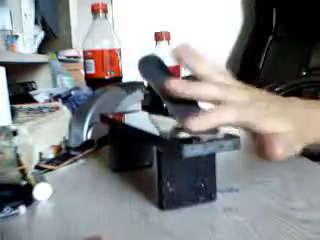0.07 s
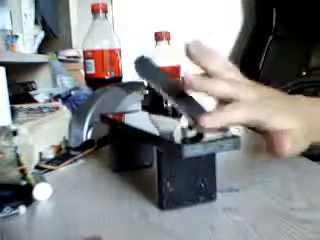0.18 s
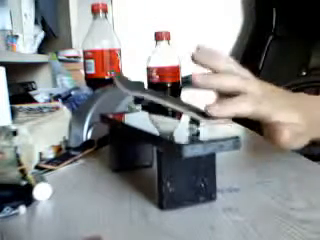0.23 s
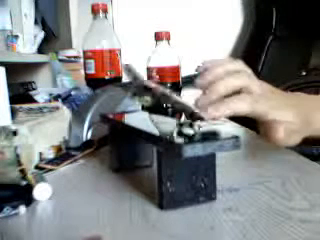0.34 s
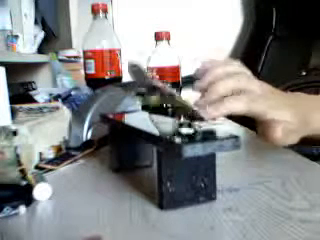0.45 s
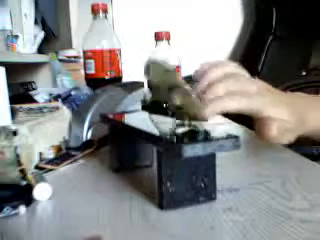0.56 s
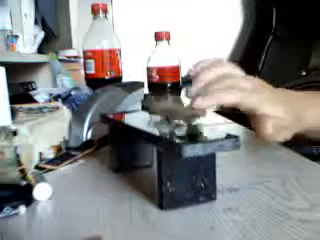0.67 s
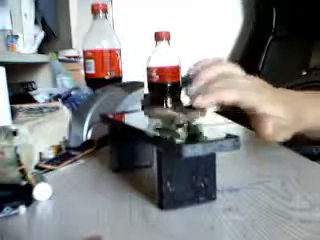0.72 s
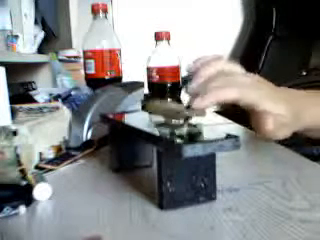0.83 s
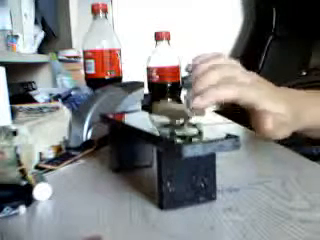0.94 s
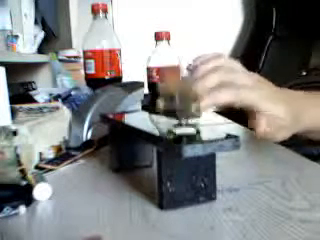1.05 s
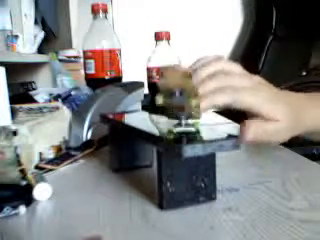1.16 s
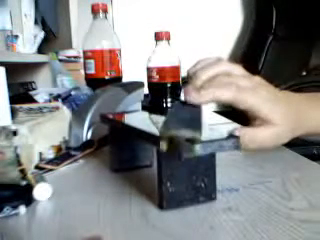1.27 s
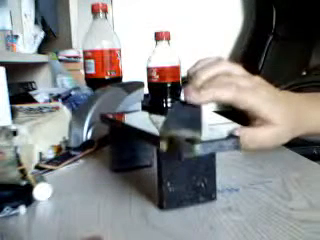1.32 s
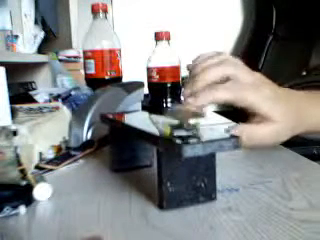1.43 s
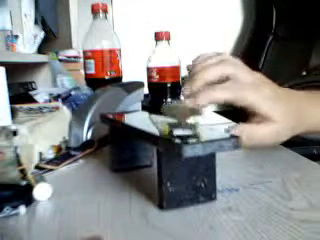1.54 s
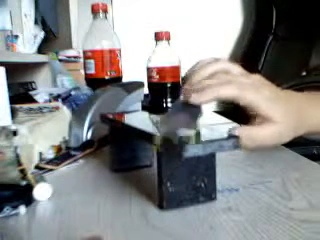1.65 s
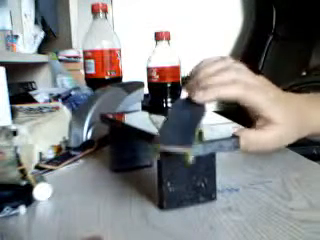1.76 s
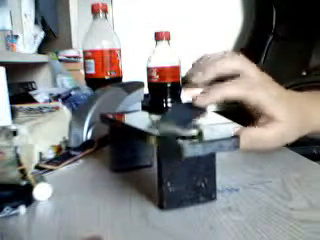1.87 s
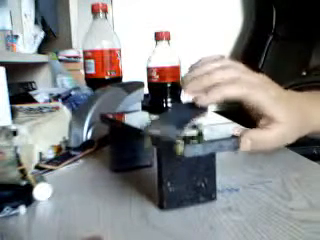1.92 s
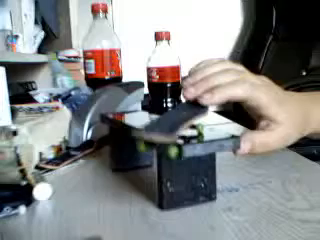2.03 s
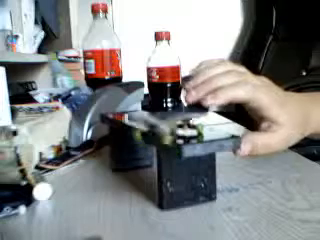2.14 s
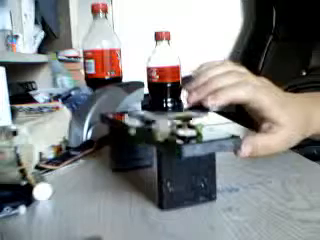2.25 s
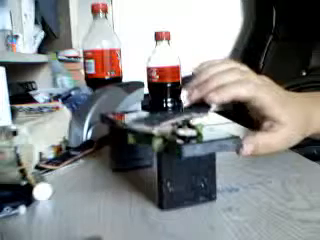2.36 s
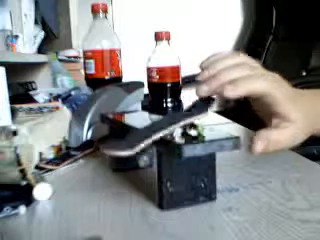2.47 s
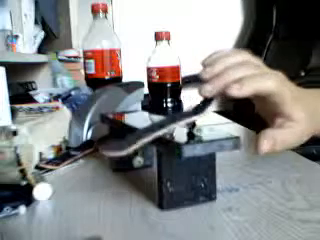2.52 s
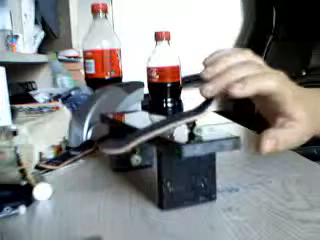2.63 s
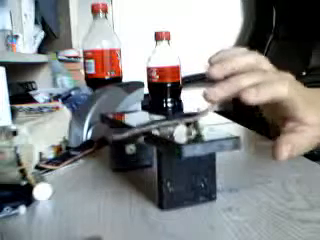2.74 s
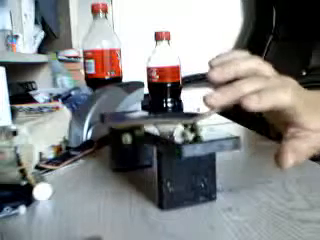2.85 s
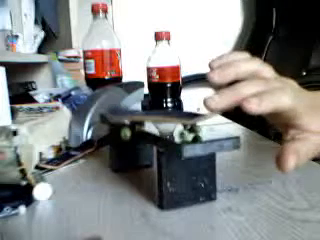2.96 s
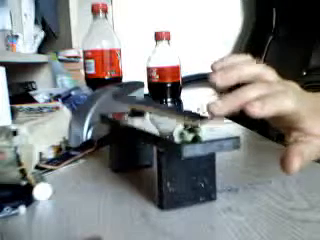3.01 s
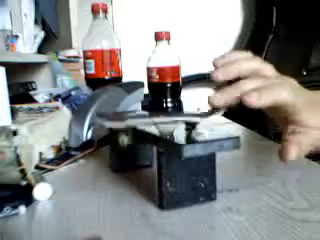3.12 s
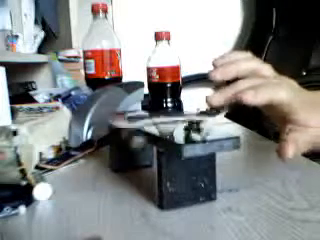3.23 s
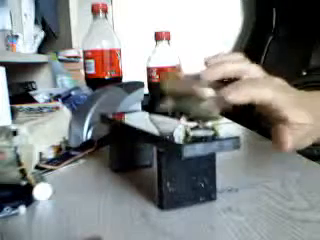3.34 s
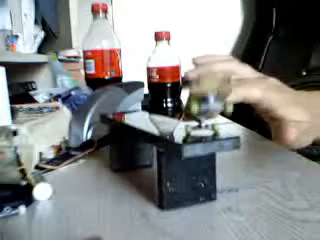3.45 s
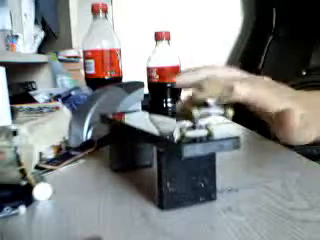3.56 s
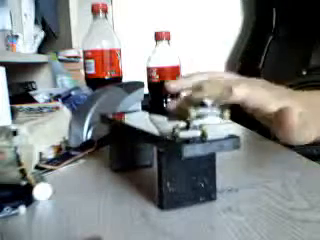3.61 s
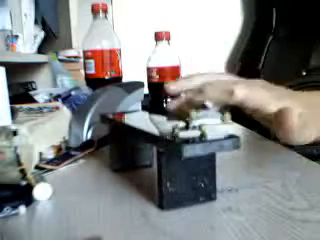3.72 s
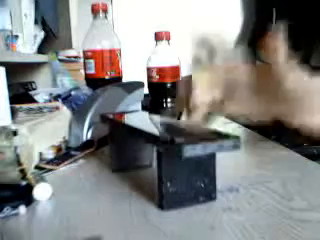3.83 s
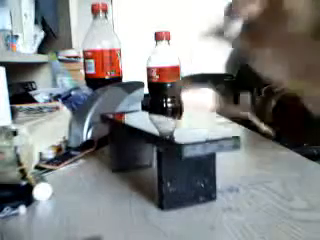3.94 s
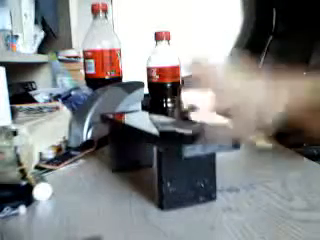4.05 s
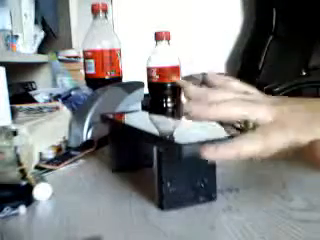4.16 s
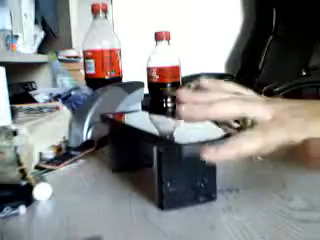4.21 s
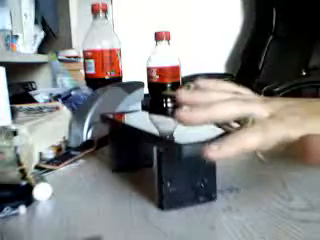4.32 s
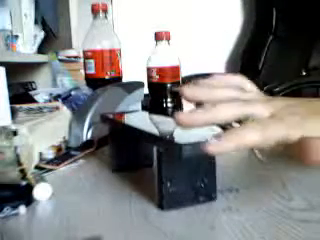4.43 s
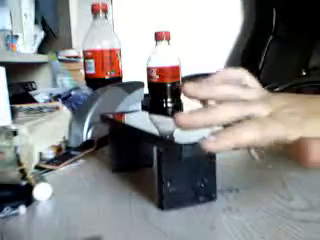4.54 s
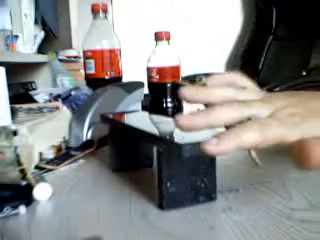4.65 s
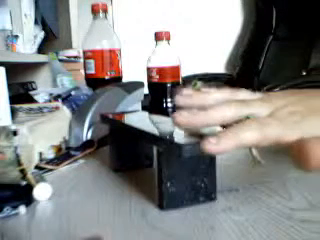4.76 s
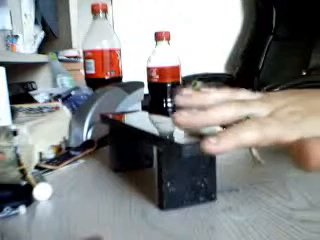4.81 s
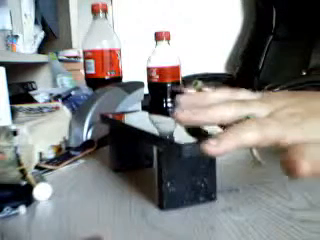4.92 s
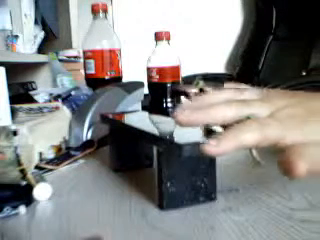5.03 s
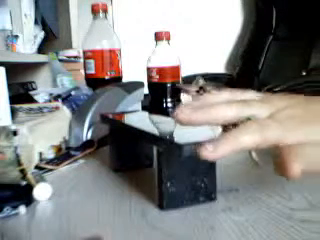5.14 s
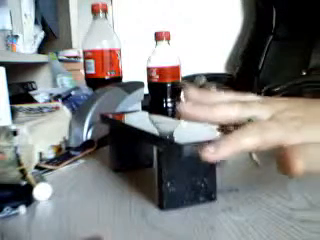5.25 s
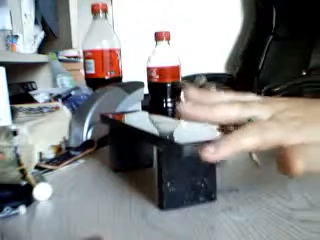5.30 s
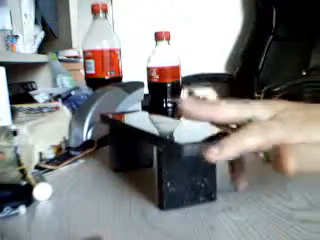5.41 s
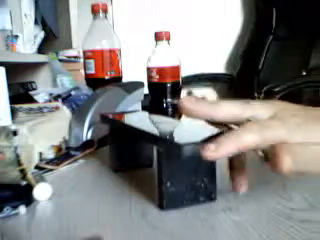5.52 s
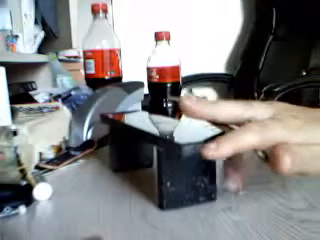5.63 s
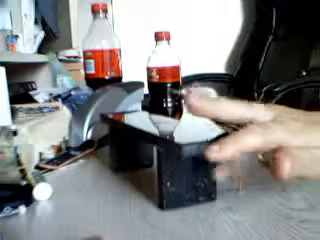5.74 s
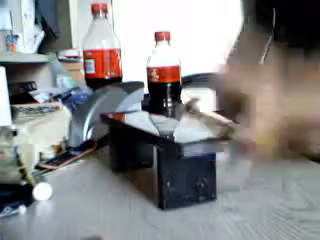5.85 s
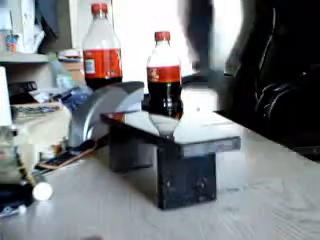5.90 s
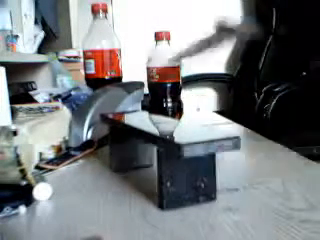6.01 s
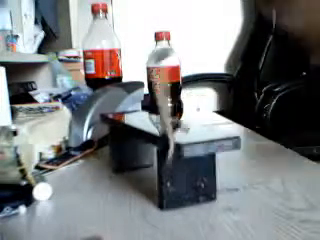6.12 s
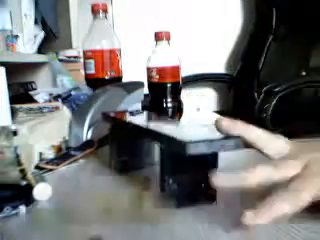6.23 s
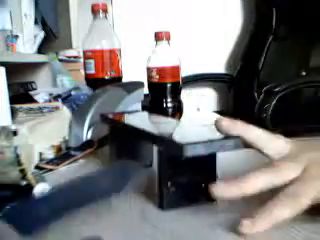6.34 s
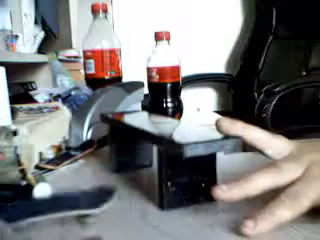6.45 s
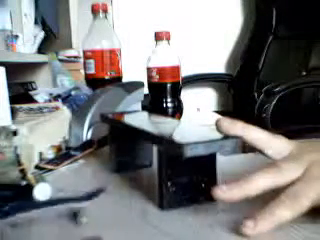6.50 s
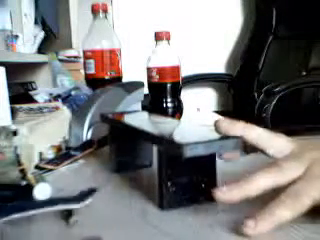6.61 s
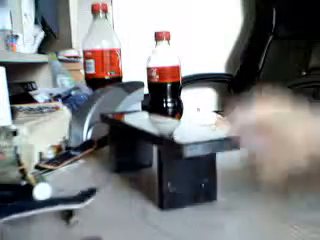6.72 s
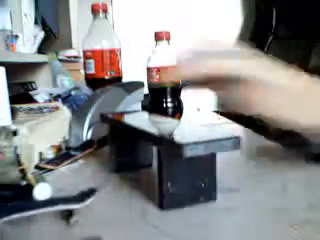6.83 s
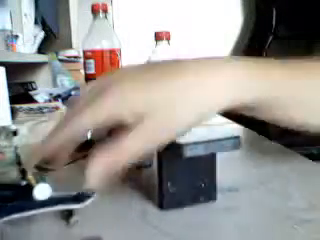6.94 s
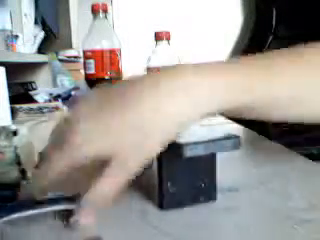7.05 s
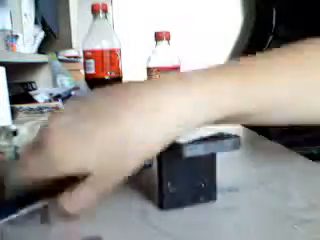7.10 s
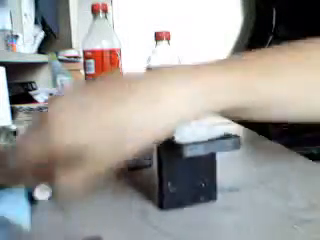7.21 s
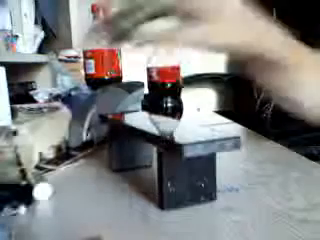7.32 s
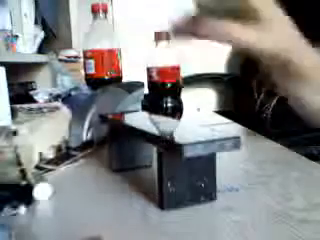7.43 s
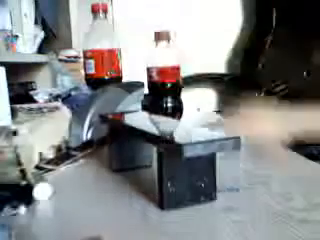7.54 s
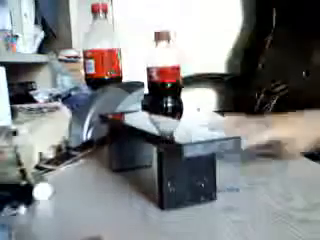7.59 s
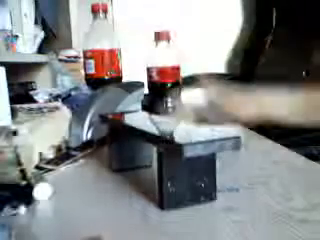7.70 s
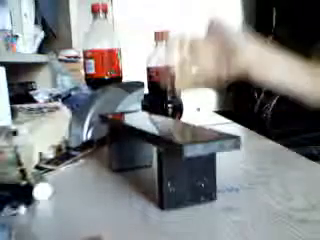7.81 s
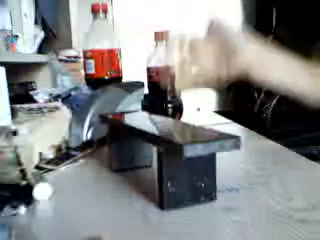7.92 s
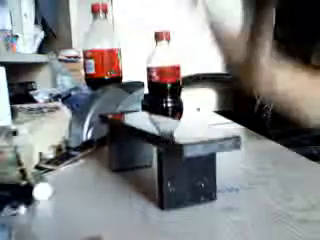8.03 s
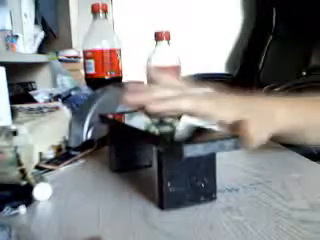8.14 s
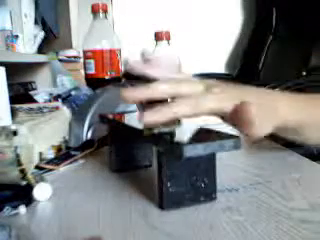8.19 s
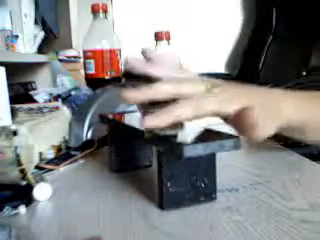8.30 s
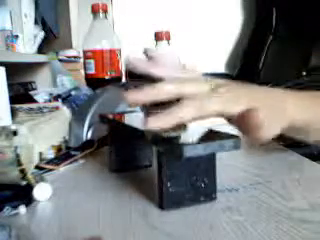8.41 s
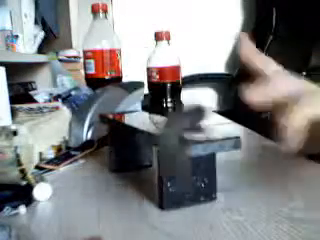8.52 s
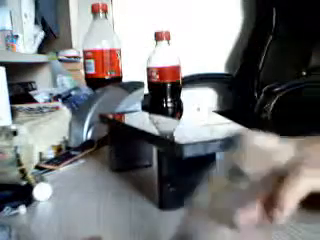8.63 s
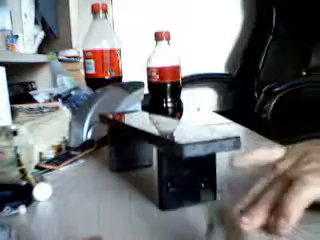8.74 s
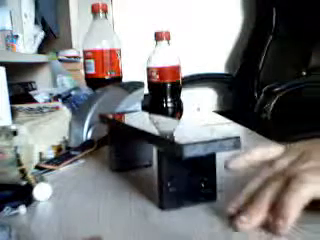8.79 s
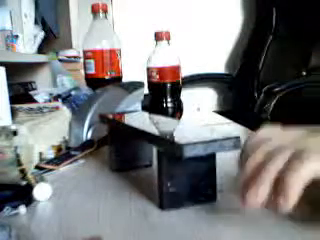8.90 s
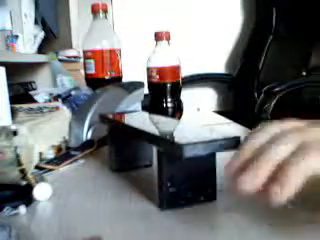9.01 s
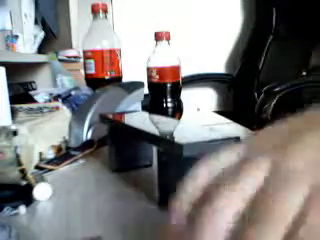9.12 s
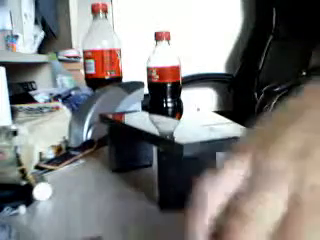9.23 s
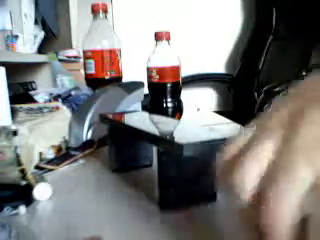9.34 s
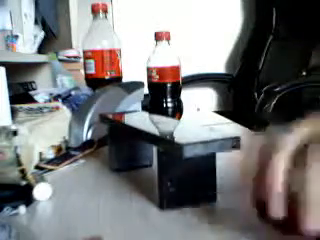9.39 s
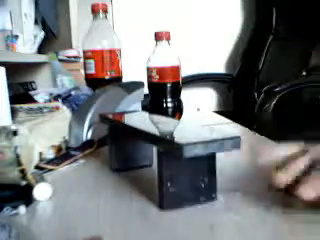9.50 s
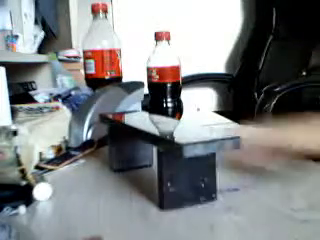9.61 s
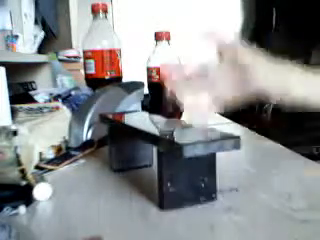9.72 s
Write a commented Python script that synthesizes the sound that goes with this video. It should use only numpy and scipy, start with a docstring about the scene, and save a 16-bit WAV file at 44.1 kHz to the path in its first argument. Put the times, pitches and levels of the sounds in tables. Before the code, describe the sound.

A toy skateboard is handled close to a modest microphone in a small room, over steady soft hiss. A soft fingertip knock comes at 0.1 seconds, then faint bright ticks at 0.9, 1.3 and 1.65. Quiet follows until a tight flurry of small clicks from 3.8 to 4.1, with weak ticks to 4.4. Faint touches at 5.1 to 5.25 bring a very faint wheel spin; a click follows at 5.8. A hard clack at 6.05 with a short whirr leads to a loud double landing at 6.27 and small rattles until 6.5. Light ticks and a faint scrape occur around 7.0 to 7.2. Strong clacks at 7.5, 7.7 and 8.05 surround a short gritty scrape at 7.6. Soft wooden knocks from 8.4 precede lower, woodier clatters at 8.55 to 8.8. Weak taps from 9.1 end in another scrape near 9.6 and a click. Low air rumbles swell, strongest near 7.8 and 9.7.

```python
"""A small room, close to a webcam: a toy skateboard is popped, slid and dropped on a stone ledge and wooden table.
Noisy blows and rattles ring wheels, deck, hollow, axles and ledge as resonances; grit feeds the same parts in scrapes.
Soft pulses ring the table, short sines make ticks, and narrow noise makes a wheel spin on.
The room answers with decaying noise; the microphone adds hiss and low noise from air pushed by the hand."""
import sys
import numpy as np
from scipy import signal
from scipy.fft import rfft, irfft, next_fast_len
from scipy.io import wavfile
from scipy.ndimage import uniform_filter1d

SR = 44100
rng = np.random.default_rng(int(sys.argv[2]) if len(sys.argv) > 2 else 0)


def log_audio(samples):
    """Write samples as a 16-bit WAV file to the path given in sys.argv[1]."""
    # one column per channel
    frames = np.atleast_2d(samples).T
    # limit to full scale, then quantise
    limited = np.clip(frames, -1, 1)
    pcm = np.round(limited * 32767).astype(np.int16)
    wavfile.write(sys.argv[1], SR, pcm)


N = 430416
SPAN = 20000  # samples rendered for each event

# resonances of the board and what it lands on: centre_hz, width_hz, gain_db
WHEELS = [(3700, 1180, -1), (4360, 700, 4.5), (5150, 1640, -3.5)]
# resonances of the deck: centre_hz, width_hz, gain_db
DECK = [(1935, 700, 0), (2720, 1100, -12), (3180, 930, -4)]
# the air and panel under the landing place: centre_hz, width_hz, gain_db
HOLLOW = [(796, 420, -8), (1066, 250, -6.5), (1492, 400, -1.5)]
# resonances of the axles: centre_hz, width_hz, gain_db
AXLES = [(6300, 3800, -0.5), (8000, 1400, 5), (8350, 2100, 4)]
# the stone slab: centre_hz, width_hz, gain_db
LEDGE = [(2240, 330, 0)]
PARTS = WHEELS, DECK, HOLLOW, AXLES, LEDGE


def amp(db):
    """dB to gain."""
    return 10 ** (np.asarray(db) / 20)


def unit(x):
    """x at rms 1."""
    return x / np.sqrt(np.mean(x ** 2) + 1e-20)


def peak(x):
    """x with its top at 1."""
    return x / np.abs(x).max()


def along(points, hz):
    """(Hz, value) points read on a log frequency axis."""
    f, v = np.transpose(points)
    return np.interp(np.log(hz + 1), np.log(f + 1), v)


def filtered(x, response):
    """x times a complex response of frequency."""
    m = next_fast_len(x.shape[-1] + SR // 4)
    spectrum = rfft(x, m) * response(np.fft.rfftfreq(m, 1 / SR))
    return irfft(spectrum, m)[..., :x.shape[-1]]


def body(modes, scatter_db=0, order=1):
    """Causal response of damped resonances, with scattered strengths; order 2 has steeper skirts."""
    gains = amp(scatter_db * rng.standard_normal(len(modes)))

    def response(f):
        total = 0
        for k, (centre, width, db) in enumerate(modes):
            resonance = 1j * f * width / (centre * centre - f * f + 1j * f * width)
            total = total + (-1) ** k * gains[k] * amp(db) * resonance ** order  # signs alternate
        return total

    return response


def room(x):
    """A fresh diffuse tail of energy 1; each frequency dies at its own speed."""
    # decay of the small room: frequency_hz, t60_s
    decay = [(300, 0.13), (1500, 0.19), (4300, 0.29), (9000, 0.24)]
    hz, t, z = signal.stft(rng.standard_normal(SR // 2), SR, nperseg=256)
    fading = z * amp(-60 * t / along(decay, hz)[:, None])
    tail = signal.istft(fading, SR, nperseg=256)[1]
    # the first walls are a metre or two away: the tail builds up over 3.6 ms
    tail = tail * np.minimum(np.arange(len(tail)) / SR / 0.0036, 1)
    return signal.fftconvolve(x, tail / np.linalg.norm(tail))[:len(x)]


def add(track, s, sound):
    """Mix a sound into the track at s seconds."""
    track[round(s * SR):][:len(sound)] += sound


def microphone():
    """Steady shaped hiss, and mostly subsonic noise whose level follows air pushed by the hand."""
    # hiss spectrum, relative density: frequency_hz, density_db
    hiss_shape = [(18, -43), (30, 8.5), (38, -2), (158, -9), (291, -11.5), (321, -12.5), (381, -14),
                  (1060, -19), (1200, -19.5), (10300, -30), (13400, -46), (22000, -120)]
    # spectrum of the moving air, relative density: frequency_hz, density_db
    air_shape = [(2, 2.5), (12, 5), (20, -8.5), (30, -32), (60, -24), (150, -32.5), (300, -78), (600, -120)]
    # air pushed by the hand: time_s, rms_db
    sway_level = [(0.0, -50), (0.05, -36.5), (0.89, -50), (3.8, -45.5), (4.16, -28), (5.33, -51.5),
                  (6.25, -22.5), (6.85, -39), (7.55, -33), (7.8, -18), (8.05, -35.5), (8.24, -26.5),
                  (8.32, -42.5), (8.78, -32.5), (8.83, -44), (9.54, -34.5), (9.71, -14.5), (9.76, -22)]
    hiss = unit(filtered(rng.standard_normal(N), lambda hz: amp(along(hiss_shape, hz))))
    sway = unit(filtered(rng.standard_normal(N), lambda hz: amp(along(air_shape, hz))))
    mirror = unit(filtered(rng.standard_normal(N), lambda hz: hz > 10300))  # faint treble noise
    s, db = np.transpose(sway_level)
    sway_db = np.interp(np.arange(N) / SR, s, db)
    return amp(-45) * hiss + amp(-69.5) * mirror + amp(sway_db) * sway


def spins():
    """Bearing friction feeds one narrow resonance and fades as the wheel slows."""
    # a loose wheel spins on: start_s, starting_rms_db, t60_s
    spin_times = [(5.245, -52, .6), (6.06, -33, .3)]
    # its rough note: centre_hz, width_hz, gain_db
    rough_note = [(4310, 130, 0)]
    track, t = np.zeros(N + SPAN), np.arange(SPAN) / SR
    for s, db, t60 in spin_times:
        note = unit(filtered(rng.standard_normal(SPAN), body(rough_note, order=2)))
        add(track, s, amp(db - 60 * t / t60) * note)
    return track[:N]


def ticks():
    """A small hard part touches once: a sine with a soft onset and a 10 ms decay."""
    # touches, level before the onset and decay: start_s, level_db, pitch_hz
    touches = [(0.8624, -29, 4080), (3.778, -30, 4000), (4.3859, -34.5, 3810), (4.4418, -25, 3800),
               (5.1306, -27.5, 4060), (6.9595, -24.5, 2530), (7.0788, -36.5, 4590), (7.196, -27, 1500),
               (7.199, -21.5, 4360), (8.546, -18.5, 4300)]
    tick_t60_s, onset_s = 0.01, 0.00094
    track, t = np.zeros(N + SPAN), np.arange(SPAN) / SR
    for s, db, hz in touches:
        envelope = amp(db - 60 * t / tick_t60_s) * (1 - np.exp(-t / onset_s))
        dry = envelope * np.sin(2 * np.pi * hz * t)
        add(track, s, dry + amp(-10) * room(dry))
    return track[:N]


def knocks():
    """A soft fingertip push rings the table top and rocks it on its legs."""
    # soft knocks: start_s, top_peak_db, legs_db (re top)
    pushes = [(0.077, -29.5, -28), (4.114, -41, 3.5), (6.001, -31, -28), (6.082, -32, -1.5),
              (6.384, -36, -29), (6.463, -35, -15), (6.959, -31, -10), (7.735, -31, -8),
              (7.908, -30.5, -14), (7.995, -29, -14), (8.377, -26.5, -19), (8.428, -30, -26),
              (8.491, -28.5, -19), (8.516, -35, -16), (8.554, -26, -16), (9.55, -30, -16)]
    # the table top: centre_hz, width_hz, gain_db
    top_modes = [(234, 51, 0.5), (310, 49, 2.5), (566, 64, 4), (834, 150, 1), (1390, 1100, -3)]
    # the whole table on its legs: centre_hz, width_hz, gain_db
    leg_modes = [(110, 18, 0)]
    contact_s = 0.00015  # time constant of fingertip on wood
    track, u = np.zeros(N + SPAN), np.arange(SPAN) / SR / contact_s
    push = u ** 2 * np.exp(-u)
    for s, db, legs_db in pushes:
        top = peak(filtered(push, body(top_modes, scatter_db=2.5)))
        legs = peak(filtered(push, body(leg_modes, scatter_db=2.5)))
        dry = amp(db) * (top + amp(legs_db) * legs)
        add(track, s, dry + amp(-6.5) * room(dry))
    return track[:N]


def scrapes():
    """Uneven grit under a sliding contact feeds wheels, deck, hollow and axles."""
    # the board scrapes over stone or skin: start_s, attack_s, hold_s, release_s, wheel_rms_db,
    # deck_db, hollow_db, axle_db (re wheel)
    slides = [(7.0, 0.026, .18, .07, -53.5, -9, -3, -8), (7.61, 0.058, 0.014, 0.069, -31, -3.5, -5.5, -8.5),
              (9.52, 0.0068, 0.054, .02, -51, -2, 6.5, 1.5),
              (9.575, 0.042, 0.041, 0.047, -31.5, -2, -5.5, -3)]
    edge_db = -17.5  # at the start and at the end of the release, re hold
    track, t = np.zeros(N + SPAN), np.arange(SPAN) / SR
    for s, attack, hold, release, db, *others_db in slides:
        away = np.maximum(1 - t / attack, (t - attack - hold) / release)  # 0 or less within the hold
        press_db = db + edge_db * np.maximum(away, 0)
        # grip comes and goes within milliseconds
        catches = unit(uniform_filter1d(rng.standard_normal(SPAN), size=130))
        roughness_db = 3.3 * rng.standard_normal(SPAN) + 2.9 * catches
        grit = rng.standard_normal(SPAN) * amp(roughness_db)
        dry = np.zeros(SPAN)
        for modes, more_db in zip(PARTS, [0, *others_db]):
            dry += amp(press_db + more_db) * unit(filtered(grit, body(modes, order=2)))
        add(track, s, dry + amp(-12) * room(dry))
    return track[:N]


def hits():
    """A blow and a dying rattle of loose parts ring wheels, deck, hollow, axles and ledge."""
    # contacts of the board: start_s, wheel_peak_db, pitch_hz (pulls the wheel modes and sets the rattle),
    # deck_db, hollow_db, axle_db, ledge_db (re wheel)
    contacts = [(1.262, -26.5, 4310, -31, -12.5, -7, -5), (1.274, -38, 4810, -22, -21, -16, -19),
                (1.6514, -28, 4000, -21, -11.5, -13, -7), (3.816, -26, 4450, -28, -27, 3.5, -30),
                (3.8274, -24, 4970, -30, -29, -2, -37), (3.9673, -23, 4360, -27, -22, -17, -19),
                (3.9731, -18, 4260, -28, -31, -19, -29), (3.9819, -19, 4800, -24, -33, -6, -19.5),
                (3.9963, -30, 4440, -25, -33, -9, -10), (4.0404, -24.5, 4600, -29, -29, -11, -27),
                (4.0682, -31, 4500, -25, -8, -9, -11), (5.2485, -43.5, 4290, -14, -16, -14, -1),
                (5.808, -36, 4270, -21, -22, -6, -30), (5.8312, -20, 4100, -21, -22, -7.5, -21),
                (6.0561, -11, 4340, -12, -20.5, -4.5, -30), (6.0658, -33, 4350, -21, -27, 7, -8),
                (6.1605, -32.5, 4100, -3, -24, -4, -30), (6.265, -13.5, 3900, -13, -9, -1, -39),
                (6.2759, -8.5, 4730, -33, -17, -27, -34), (6.358, -38, 4300, 1, 3, 4, -17),
                (6.3782, -33, 4500, -5, -13, -1, -22), (6.4015, -31.5, 4080, 3, 11, 4, -10),
                (6.4095, -37, 4460, -10, -9, -3, -17), (6.4678, -29, 4080, -11, -2, -5.5, -23),
                (7.168, -39, 4620, -17, -6, -17, -23), (7.5107, -10.5, 4360, -16, -15.5, -6.5, -36),
                (7.5274, -23.5, 4270, 6.5, 4, -1, -14), (7.719, -11.5, 4630, -16, -23, -4.5, -32),
                (8.049, -9, 4340, -13.5, -21.5, -1.5, -31), (8.3895, -35, 4400, -21, -27, -10, -24),
                (8.407, -27, 4300, -24, -31, -6, -31), (8.5589, -18, 3800, -7.5, -16, -3.5, -21),
                (8.6305, -13.5, 3970, 0.5, -2.5, -7, -29), (8.6983, -17.5, 3750, 0.5, -4, -15, -18),
                (8.7264, -11.5, 3700, 3, -10, -2.5, -30), (8.7843, -23, 3740, -9, -6, -22, -12),
                (9.1251, -34, 3920, -24, -16, -2, -28), (9.222, -33.5, 4140, 1, 0.5, -2, -21),
                (9.233, -42, 3560, 4.5, 1, -19, -21), (9.395, -26, 4120, -13, -10.5, -6, -28),
                (9.4549, -39, 3950, 1.5, 5, 9.5, -15), (9.5223, -44, 4480, -9, -2, 6, -16),
                (9.6572, -19.5, 4250, -20, -9, -13, -27)]
    rattle_s, rattle_power, onset_s = 0.026, 2.2, 0.00037  # t60 lengthens as pitch falls
    room_db, hard_drier = -6, 0.22  # room under a 0 dB click; dB drier per dB harder
    # a short hiss swells before each blow: length, top re the rattle, rise
    lead_s, lead_db, lead_db_per_s = 0.012, -13.5, 1202
    lead = round(lead_s * SR)
    track, t = np.zeros(N + SPAN), (np.arange(SPAN) - lead) / SR
    for s, db, hz, *others_db in contacts:
        pull = hz / WHEELS[1][0]
        wheels = np.array(WHEELS) * [pull ** 0.46, 1, 1]  # the point of contact pulls the wheel modes
        grain = rng.standard_normal(SPAN) * amp(6.2 * rng.standard_normal(SPAN))
        t60 = rattle_s / pull ** rattle_power
        rattle = amp(-60 * abs(t) / t60) * (1 - np.exp(-abs(t) / onset_s))
        swell = amp(lead_db - lead_db_per_s * abs(t))
        force = grain * np.where(t < 0, swell, rattle)
        force[lead + SR // 2000] = 8  # the hardest instant of the blow
        levels_db = db + np.array([0, *others_db])
        for modes, level_db in zip((wheels, *PARTS[1:]), levels_db):
            ring = body(modes, scatter_db=4, order=2)
            dry = amp(level_db) * peak(filtered(force, ring))
            click = filtered(1. * (t == 0), ring)  # far walls hear the smooth colour of the part
            same_energy = np.linalg.norm(dry) / np.linalg.norm(click)
            wet = amp(room_db - hard_drier * db) * same_energy
            add(track, s - lead_s, dry + room(wet * click))
    return track[:N]


def scene():
    """Everything at one microphone."""
    return (microphone() + spins() + ticks() + knocks() + scrapes() + hits())[None]


def record(dry):
    """The converter's steep edge, gap and faint mirror band, then the band limit."""
    # the converter's response: frequency_hz, gain_db
    converter = [(10000, 0.5), (10600, -1), (10800, -22), (11250, -48), (11450, -3.5), (12000, -16),
                 (12500, -40)]
    top_hz = 12550
    return filtered(dry, lambda hz: amp(along(converter, hz)) * (hz < top_hz))


dry = scene()
out = record(dry)
log_audio(out)
```